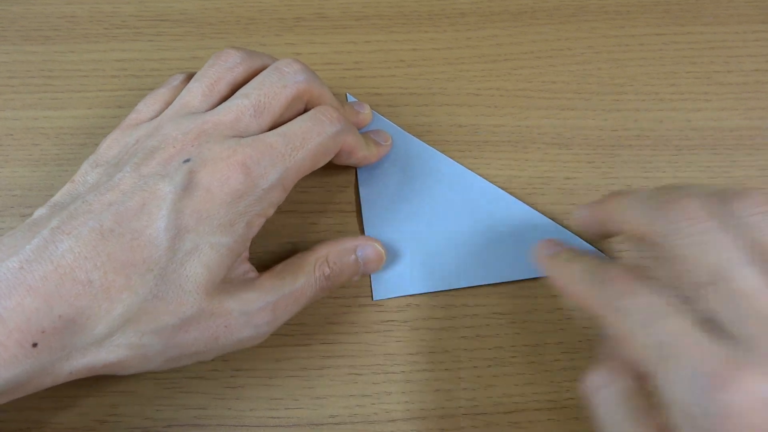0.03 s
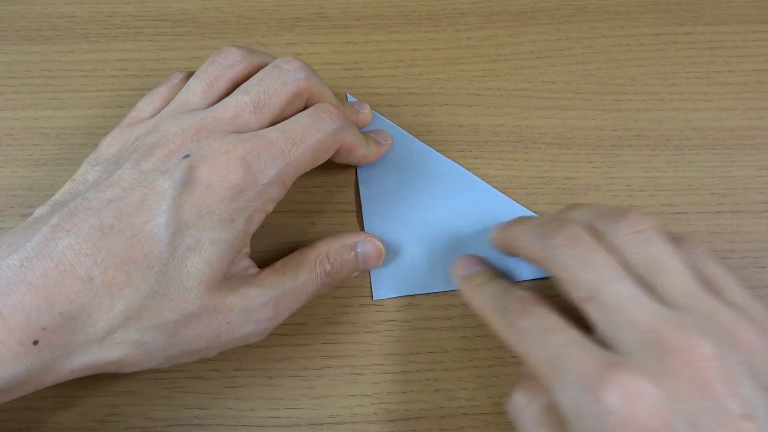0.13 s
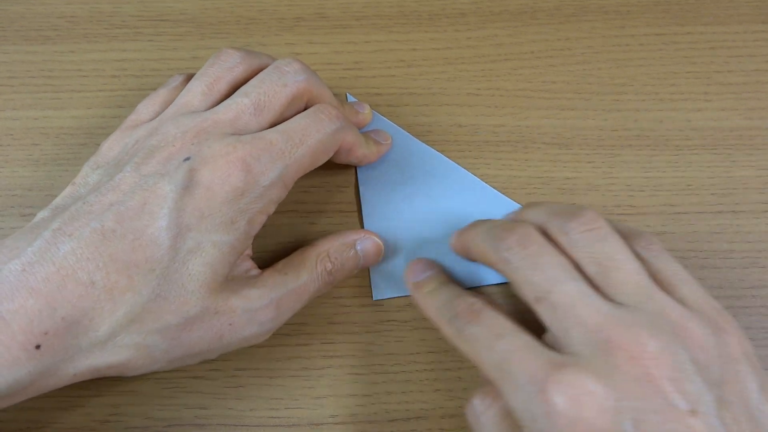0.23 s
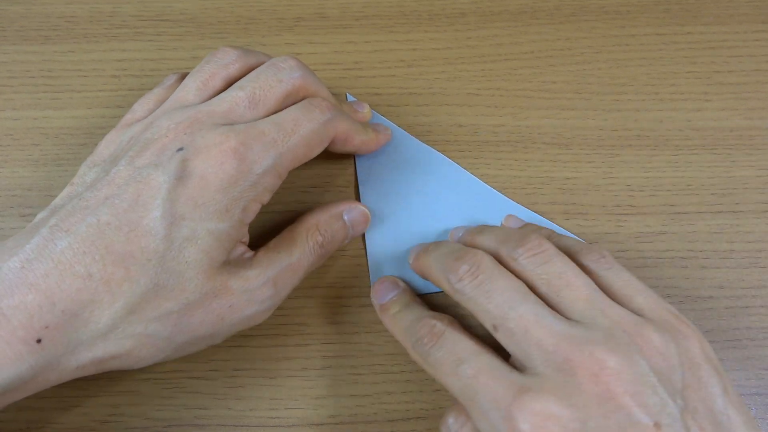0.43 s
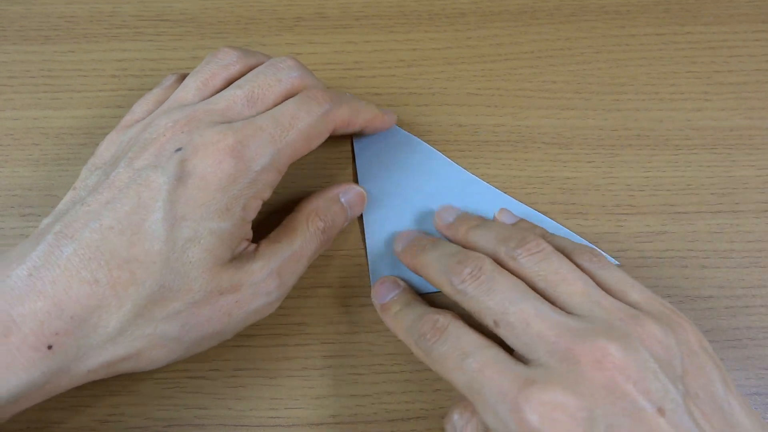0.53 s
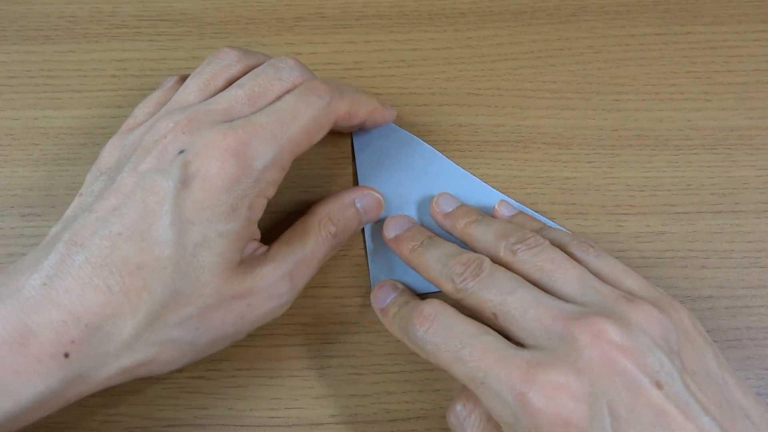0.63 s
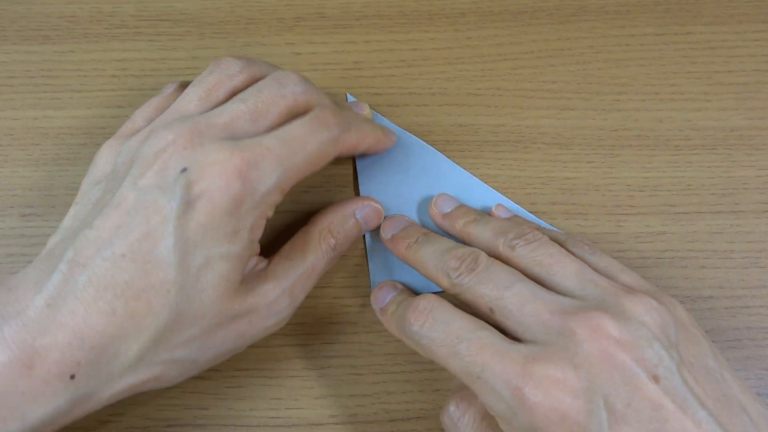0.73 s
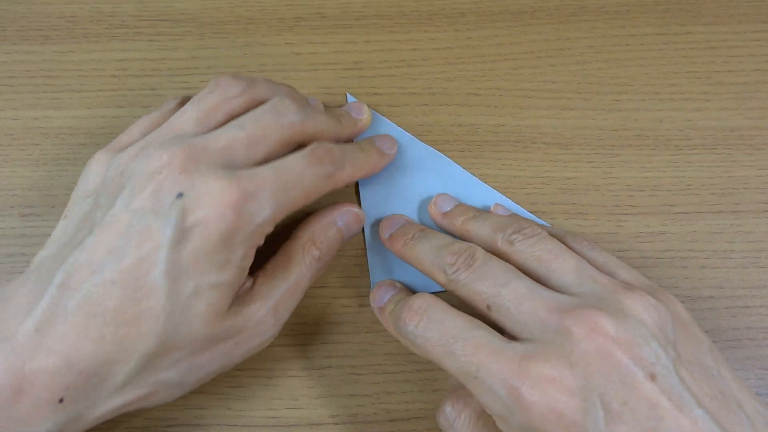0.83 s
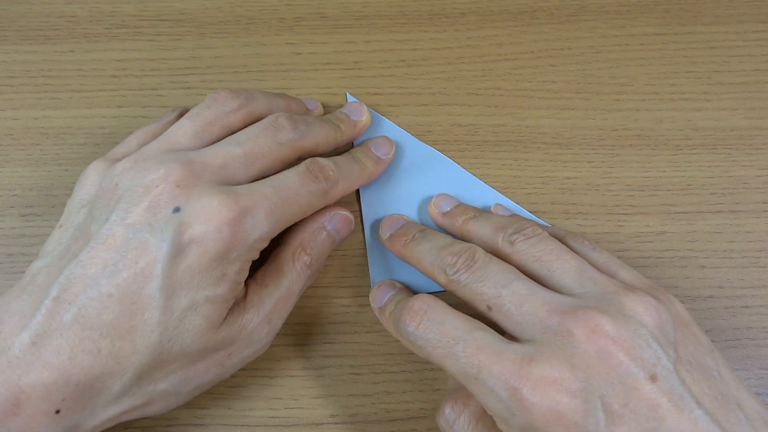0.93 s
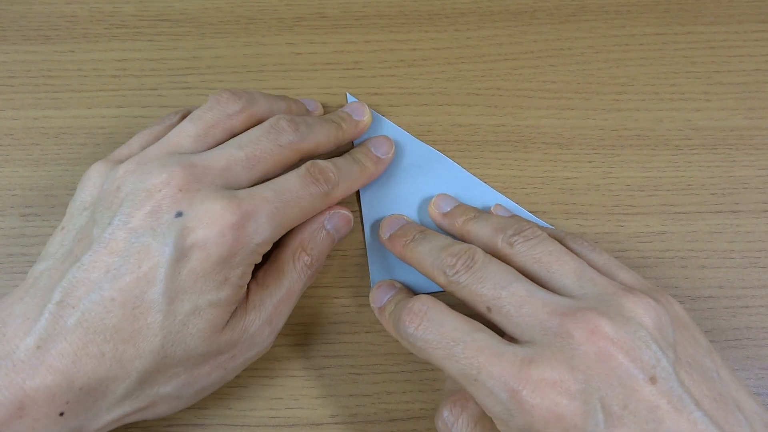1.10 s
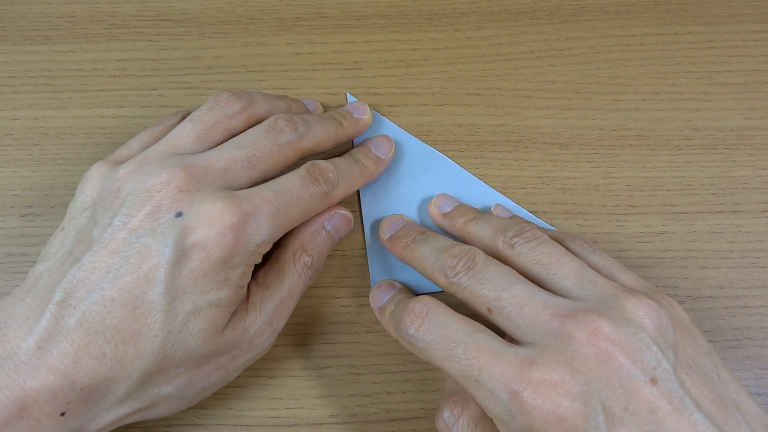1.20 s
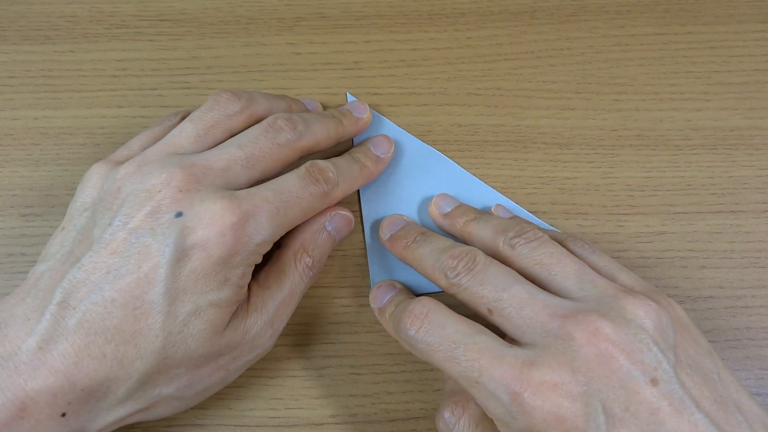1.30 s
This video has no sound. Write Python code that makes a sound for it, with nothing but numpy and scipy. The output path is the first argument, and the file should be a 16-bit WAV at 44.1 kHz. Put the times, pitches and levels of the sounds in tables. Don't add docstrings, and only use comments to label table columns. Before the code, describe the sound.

Folded paper being rubbed and pressed on a wooden table, a crisp tick early, then quiet

```python
import sys
import numpy as np
from scipy import signal
from scipy.fft import rfft, irfft
from scipy.io import wavfile
from scipy.ndimage import uniform_filter1d

SR = 44100
rng = np.random.default_rng(int(sys.argv[2]) if len(sys.argv) > 2 else 0)


def decibels_to_gain(level_db):
    exponent = np.asarray(level_db, float) / 20
    return 10 ** exponent


def wav_out(sig):
    wavfile.write(sys.argv[1], SR, np.round(np.clip(np.atleast_2d(sig).T, -1, 1) * 32767).astype(np.int16))


N = 59535

# (time [s], pressure as level [dB], sliding speed as brightness [dB], lift of the sheet [dB])
STROKES = [(0, -59, -1, 7), (0.035, -56.5, -0.5, 0.5), (.075, -63, -2, 5.5), (0.129, -73.5, -3, 0),
           (0.129, -56, 1, 6), (.155, -49, 4.5, -7), (.24, -49, 3.5, -17), (.3, -51.5, 1.5, -8.5),
           (.385, -56, -2, -17), (0.408, -65, -6, -8), (0.469, -69, 2, 2), (0.503, -55, 6, -5.5),
           (0.551, -50, 12, -16), (0.632, -59, 10.5, -5), (0.691, -74, 6, 3), (.78, -69.5, -4, -14),
           (.92, -75, -6.5, 0), (1.02, -90, 1, 3)]
# (frequency [Hz], width [Hz], level [dB], share of brightness [ratio], share of lift [ratio])
SHEET_MODES = [(900, 680, -18, -0.55, .3), (2500, 650, -13, -0.9, 0.66), (3644, 940, -6, 0.049, 1.17),
               (4830, 2000, -6.5, -0.067, 0.25), (6740, 3800, -3, 0.085, 0.15),
               (8550, 1800, -14, 0.0014, 0), (10240, 2750, -3.5, 0.75, 0.093)]
# (frequency [Hz], density [dB per Hz])
FLOOR_SPECTRUM = [(24, -33), (200, -7), (518, -1), (1000, -0.5), (2170, -2), (2560, -2.5), (3090, -8.5),
                  (4400, -8.5), (11000, -10.5), (14300, -15.5), (22000, -120)]
# (frequency [Hz], width [Hz], gain [dB])
DUCT_MODES = [
    (987, 270, 1),
    (2540, 200, 3.5),
    (4180, 800, 4.5),
]
# (frequency [Hz], side minus mid [dB])
FLOOR_WIDTH = [(60, 0), (110, -13), (190, -4), (350, 0.5), (630, 4), (1130, 1.5), (2040, 0), (3670, -2.5),
               (6610, -5), (11900, -11)]
# (time [s], peak level [dB], pitch [Hz], ring length [cycles])
TOUCHES = [(0.1293, -43.5, 3400, 30), (0.2339, -39.5, 2900, 6.9), (0.4398, -48, 1900, 5.5),
           (0.4867, -41.5, 2680, 8.9), (.646, -49, 1870, 4.5), (0.91, -61, 2620, 13),
           (1.012, -64, 1190, 4.3), (1.11, -56.5, 2500, 10), (1.176, -64.5, 1700, 11),
           (1.199, -71, 2500, 6.2), (1.305, -77, 1070, 8.7)]
# (time [s], frequency [Hz], level [dB], t60 [s])
KNOCKS = [
    (.14, 810, -61, 0.03),
    (.249, 764, -51, 0.027),
    (.27, 1237, -51.5, 0.034),
    (.4408, 464, -60.5, 0.042),
    (.4408, 666, -63.5, 0.044),
    (.4408, 900, -57, 0.013),
    (.647, 776, -63.5, .05),
    (.647, 1250, -61.5, 0.034),
    (.647, 615, -72.5, 0.093),
    (1.177, 820, -70, 0.033),
]
# (time [s], peak level [dB])
CRACKS = [
    (.24682, -13),
    (.24726, -19),
    (.24792, -23),
    (.24950, -32),
]
# (frequency [Hz], level [dB], t60 [s])
CREASE_MODES = [(900, -28, 0.014), (1770, -20, 0.0065), (2600, -25, 0.0015), (3645, 0, 0.0027),
                (4880, -9.5, 0.00067), (5000, -14, 0.0015), (5740, 2.5, 0.0022), (7100, 0.5, 0.0017),
                (9740, -2.5, 0.0051), (10800, 2, 0.0015)]
# (time [s], level [dB], length [s], pitch [Hz], width as share of pitch [ratio])
BRUSHES = [
    (0.44, -53, 0.013, 10800, 0.23),
    (0.442, -65, 0.015, 5200, 0.76),
    (0.638, -59.5, 0.017, 10200, 0.33),
    (0.643, -61, 0.023, 6000, 0.99),
    (0.741, -70.5, 0.021, 10100, 0.24),
    (0.741, -75, 0.039, 5860, 0.97),
    (0.785, -70, 0.026, 6100, 0.46),
    (.87, -74.5, 0.042, 6240, 0.59),
    (0.901, -78, .015, 5500, 0.53),
]

GRAINS_PER_S, GRAIN_SPREAD_DB = 9000, 1.5
CLUMP_DB, CLUMPS_PER_S = -0.14, 240
SHEET_LOW_CUT_HZ = 560
FLOOR_DB, FLOOR_FLICKER_DB = -69.5, 0.97
OVERTONE, OVERTONE_DB = 1.98, -8.5
CRACK_LOW_CUT_HZ = 2000
BRUSH_RISE = 0.44
NEAR_DB, NEAR_T60_S, NEAR_SIDE_DB = -8.5, 0.031, -15
ROOM_DB, ROOM_T60_S, ROOM_SIDE_DB, ROOM_DULL_HZ = -12.5, 0.15, -3, 6000
PAN_DB = -0.6
CUTOFF_HZ = 11040
SKIRT_DB, SKIRT_DB_PER_KHZ = -36, -60
HEADROOM = 1.2


def rms_one(x):
    return x / np.sqrt(np.mean(x ** 2, axis=-1, keepdims=True) + 1e-20)


def at_hz(points, hz):
    table_hz, values = np.array(points)[:, :2].T
    return np.interp(np.log(hz + 1), np.log(table_hz), values)


def drift(rate):
    settle = 4000
    pole = np.exp(-2 * np.pi * rate / SR)
    noise = rng.standard_normal(N + settle)
    return rms_one(signal.lfilter([1], [1, -2 * pole, pole ** 2], noise)[settle:])


def click(s, db):
    out = np.zeros(N)
    out[int(s * SR)] = decibels_to_gain(db)
    return out


def ring(clicks, hz, t60):
    radius, angle = decibels_to_gain(-60 / (t60 * SR)), 2 * np.pi * hz / SR
    poles = [1, -2 * radius * np.cos(angle), radius ** 2]
    return signal.lfilter([0, np.sin(angle)], poles, clicks + 1e-18)


def band(x, hz, width_hz):
    t60 = np.log(1000) / (np.pi * width_hz)
    once = ring(np.diff(x, prepend=0), hz, t60)
    return rms_one(ring(once, hz, t60))


def grains(clump_db):
    strength_db = GRAIN_SPREAD_DB * np.minimum(rng.exponential(1, N), 5)
    sizes = decibels_to_gain(strength_db) * rng.choice([-1, 1], N)
    slips = rng.random(N) < GRAINS_PER_S / SR
    return sizes * slips * decibels_to_gain(clump_db)


def rubbing():
    s, *columns = np.transpose(STROKES)
    time = np.arange(N) / SR
    level_db, bright_db, lift_db = [np.interp(time, s, column) for column in columns]
    clumps_db = CLUMP_DB * drift(CLUMPS_PER_S)
    out, power = 0, 0
    for hz, width_hz, db, bright_share, lift_share in SHEET_MODES:
        gain = decibels_to_gain(db + bright_share * bright_db + lift_share * lift_db)
        out = out + gain * band(grains(clumps_db), hz, width_hz)
        power = power + gain ** 2
    return decibels_to_gain(level_db) * out / np.sqrt(power)


def floor():
    hz = np.arange(N // 2 + 1) * SR / N
    db = at_hz(FLOOR_SPECTRUM, hz)
    for centre, width, gain_db in DUCT_MODES:
        db = db + gain_db * np.exp(-0.5 * ((hz - centre) / (width / 2)) ** 2)
    hiss = rng.standard_normal((2, N)) * decibels_to_gain(FLOOR_FLICKER_DB * drift(40))
    mid, side = rfft(hiss) * decibels_to_gain(db)
    mid = irfft(mid, N)
    side = irfft(side * decibels_to_gain(at_hz(FLOOR_WIDTH, hz)), N)
    return decibels_to_gain(FLOOR_DB) * np.array([mid + side, mid - side]) / np.std(mid)


def touches():
    out = np.zeros(N)
    for s, db, hz, cycles in TOUCHES:
        hit = click(s, db)
        t60 = cycles / hz
        out += ring(hit, hz, t60) - decibels_to_gain(OVERTONE_DB) * ring(hit, hz * OVERTONE, t60)
    return out


def table():
    out = np.zeros(N)
    for s, hz, db, t60 in KNOCKS:
        tone = ring(click(s, db), hz, t60)
        out += np.diff(tone, prepend=0) * SR / (2 * np.pi * hz)
    return out


def snap():
    cracks = sum(click(s, db) for s, db in CRACKS)
    low_cut = signal.butter(2, CRACK_LOW_CUT_HZ, "high", fs=SR, output="sos")
    thin = signal.sosfilt(low_cut, cracks)
    out = np.zeros(N)
    for k, (hz, db, t60) in enumerate(CREASE_MODES):
        strike = thin if hz > CRACK_LOW_CUT_HZ else cracks
        out += (-1) ** k * decibels_to_gain(db) * ring(strike, hz, t60)
    return out


def brush(s, db, length):
    age = np.clip((np.arange(N) / SR - s) / (length * BRUSH_RISE), 0, 60)
    return decibels_to_gain(db) * age * np.exp(1 - age)


def brushes():
    out = np.zeros(N)
    for s, db, length, hz, width in BRUSHES:
        out += brush(s, db, length) * band(grains(0), hz, hz * width)
    return out


def even(echo):
    lines = rfft(echo)
    power = uniform_filter1d(np.abs(lines) ** 2, size=120)
    return rms_one(irfft(lines / np.sqrt(power), echo.shape[-1]))


def room(x):
    t = np.arange(SR // 2) / SR
    sides = np.array([[1], [-1]])
    noise = rng.standard_normal((4, len(t))) * (t > 0.002)
    near = (noise[0] + decibels_to_gain(NEAR_SIDE_DB) * noise[1] * sides) * decibels_to_gain(-60 * t / NEAR_T60_S)
    dull = np.exp(-2 * np.pi * ROOM_DULL_HZ / SR)
    far = signal.lfilter([1], [1, -dull], noise[2] + decibels_to_gain(ROOM_SIDE_DB) * noise[3] * sides)
    far = far * decibels_to_gain(-60 * t / ROOM_T60_S)
    echo = (decibels_to_gain(NEAR_DB) * even(near) + decibels_to_gain(ROOM_DB) * rms_one(far)) / np.sqrt(len(t))
    return signal.fftconvolve(x[None], echo, axes=1)[:, :N]


def scene():
    low_cut = signal.butter(4, SHEET_LOW_CUT_HZ, "high", fs=SR, output="sos")
    sheet = rubbing() + brushes() + snap() + touches()
    paper = signal.sosfilt(low_cut, sheet) + table()
    pan = decibels_to_gain(np.array([[PAN_DB / 2], [-PAN_DB / 2]]))
    return (paper + room(paper)) * pan + floor()


def band_limit(x):
    return signal.sosfilt(signal.butter(12, 12490, fs=SR, output="sos"), x)


def record(dry):
    hz = np.arange(N // 2 + 1) * SR / N
    keep = np.clip((CUTOFF_HZ + 60 - hz) / 120, 0, 1) ** 2
    skirt = decibels_to_gain(SKIRT_DB + SKIRT_DB_PER_KHZ * np.clip(hz - CUTOFF_HZ, 0, None) / 1000)
    limited = irfft(rfft(dry) * np.maximum(keep, skirt), N)
    mix = HEADROOM * np.tanh(limited / HEADROOM)
    return band_limit(mix)


dry = scene()
out = record(dry)
wav_out(out)
```